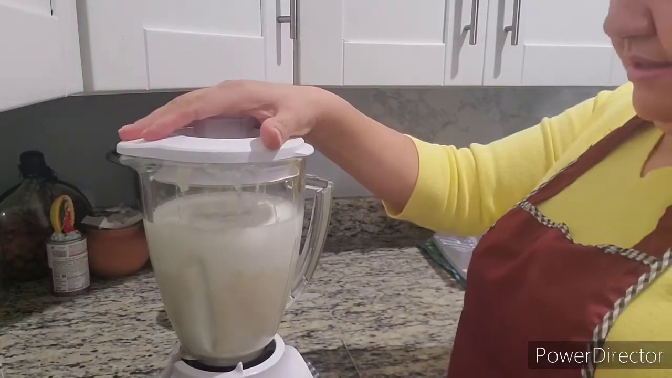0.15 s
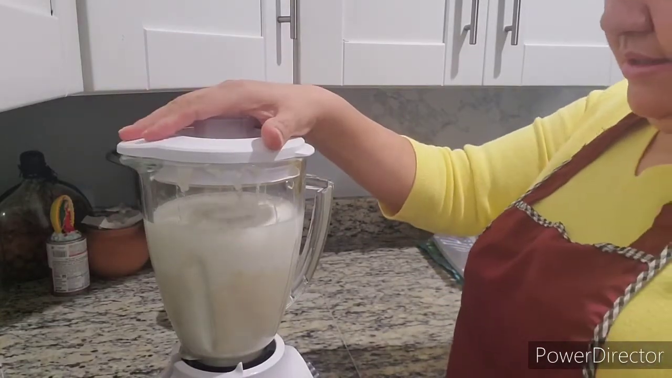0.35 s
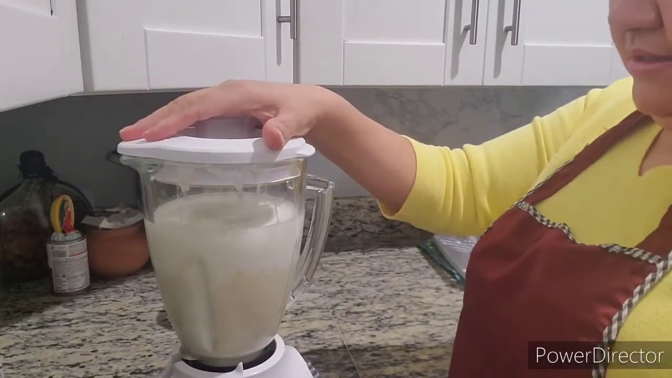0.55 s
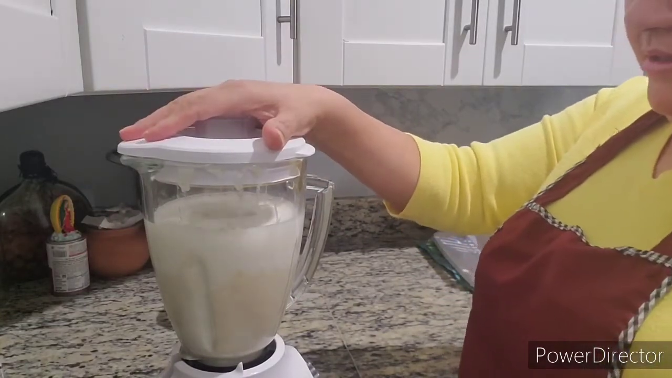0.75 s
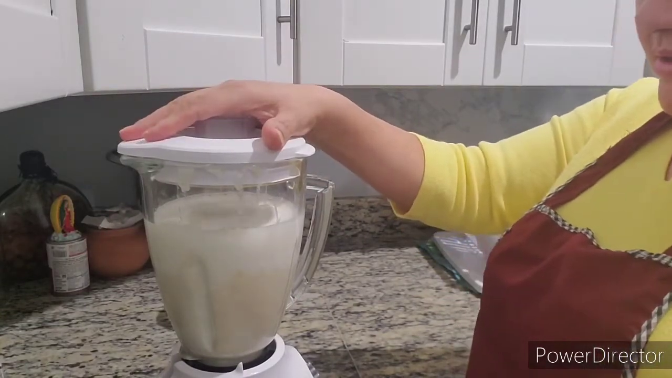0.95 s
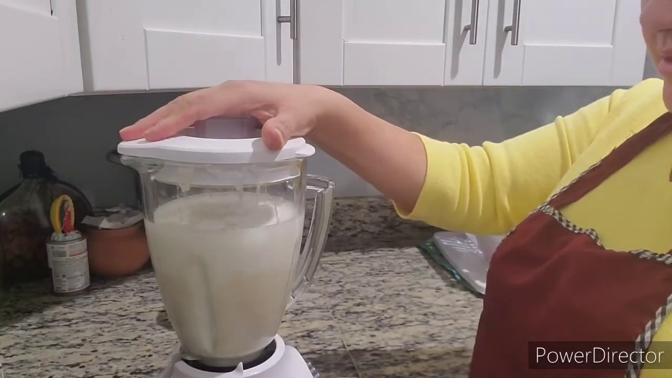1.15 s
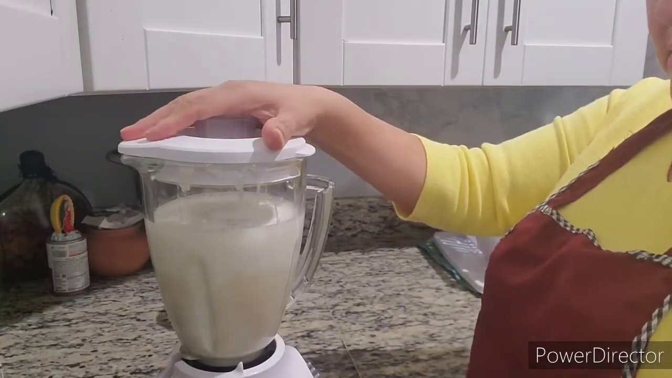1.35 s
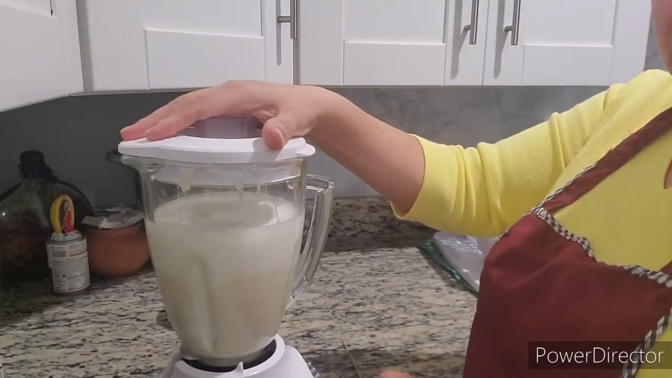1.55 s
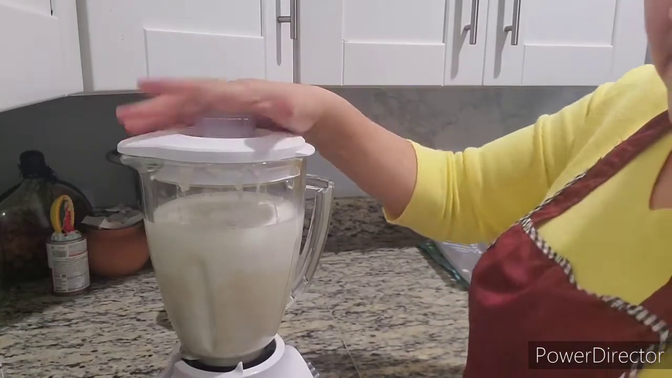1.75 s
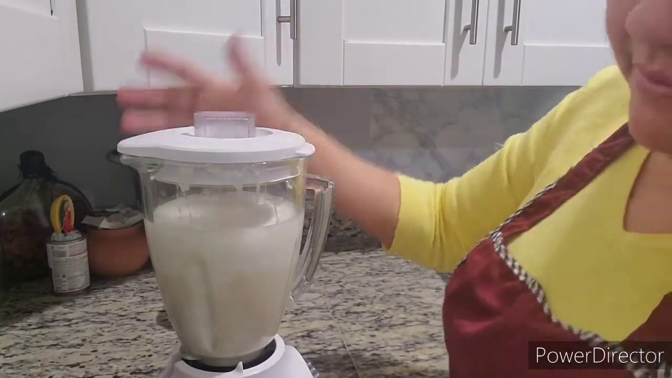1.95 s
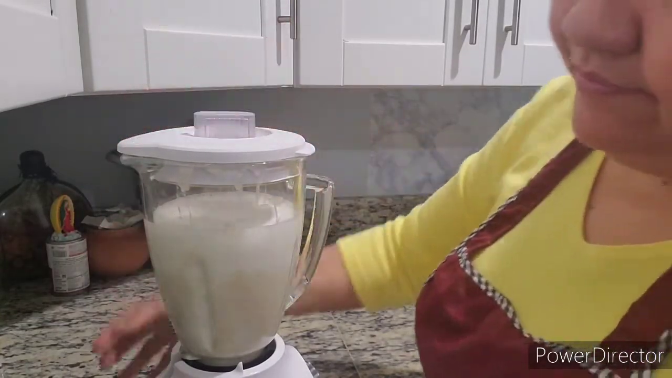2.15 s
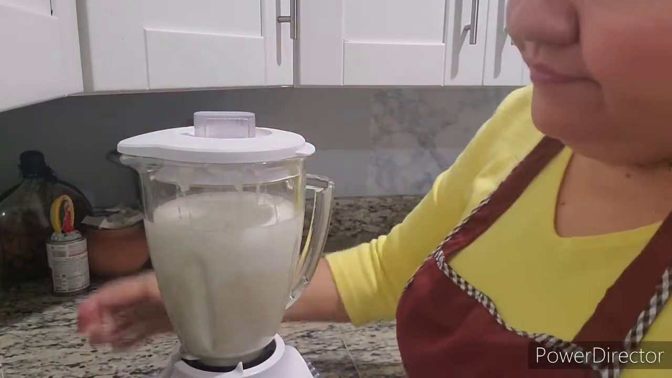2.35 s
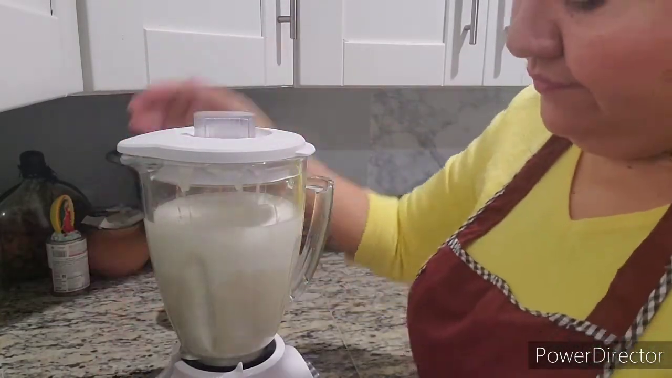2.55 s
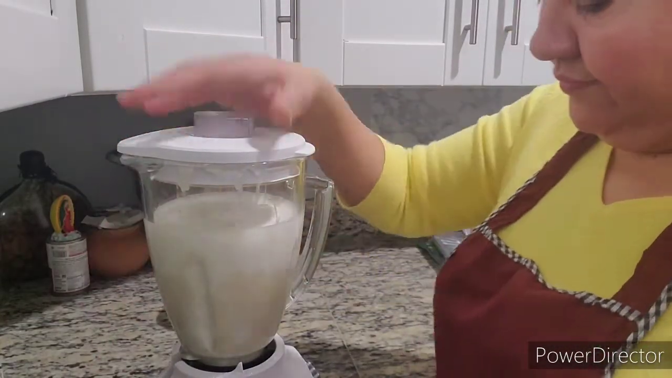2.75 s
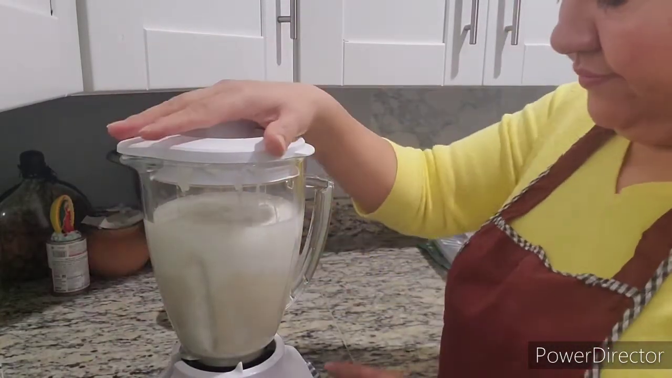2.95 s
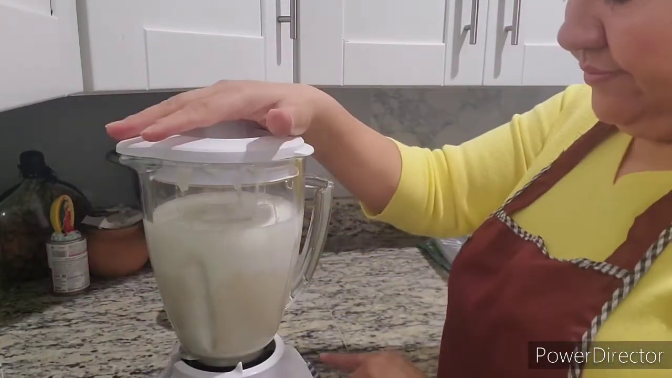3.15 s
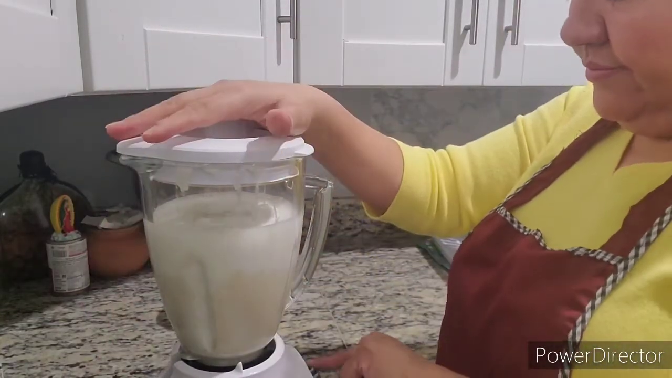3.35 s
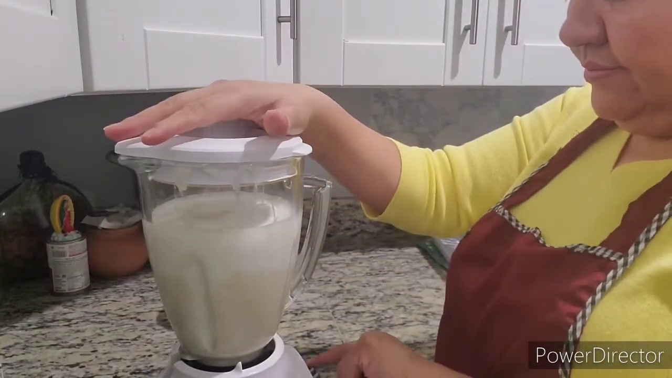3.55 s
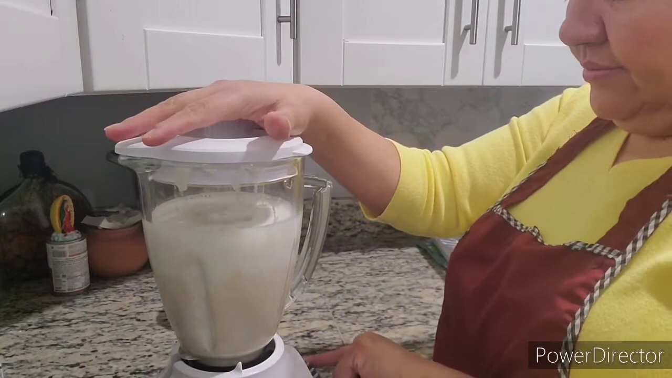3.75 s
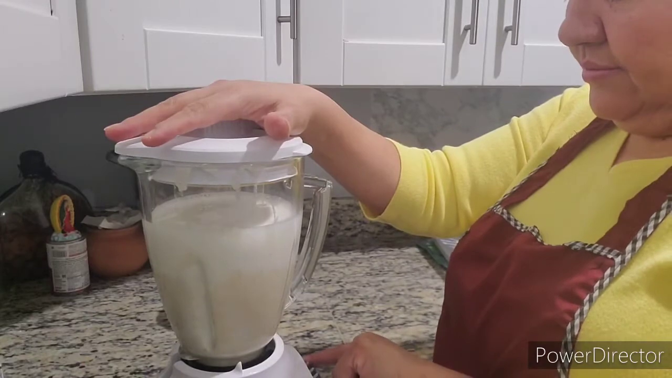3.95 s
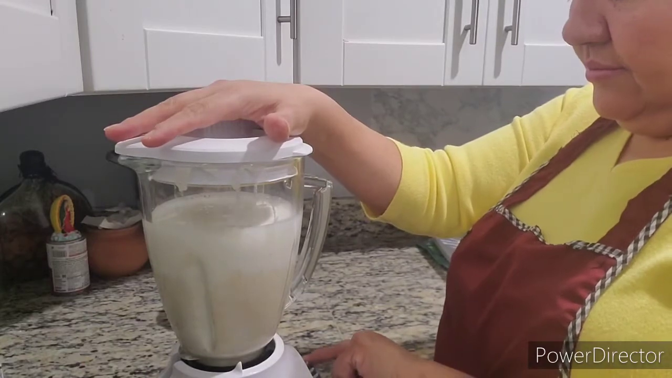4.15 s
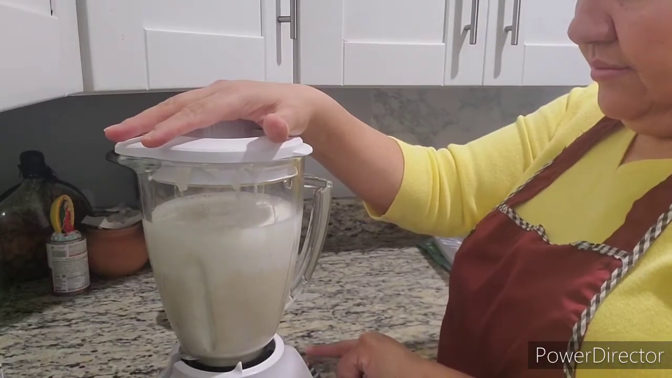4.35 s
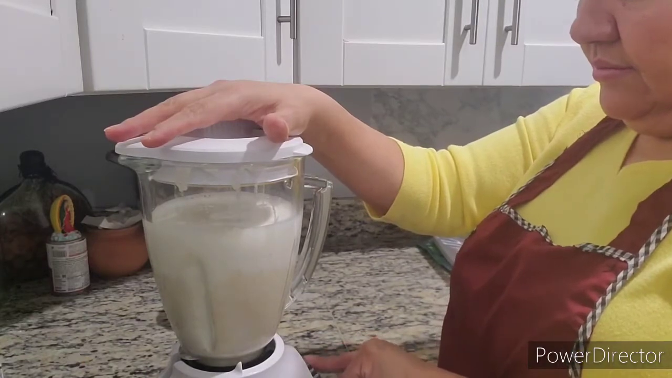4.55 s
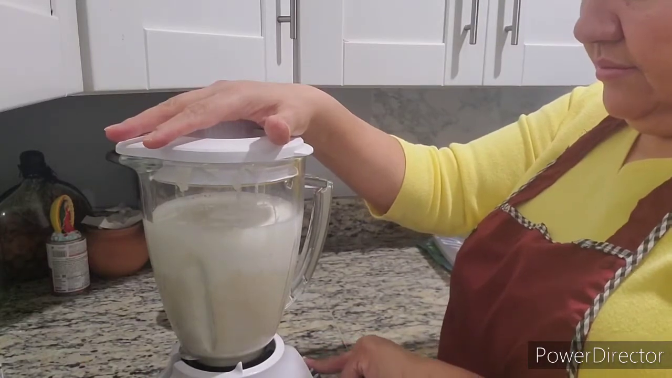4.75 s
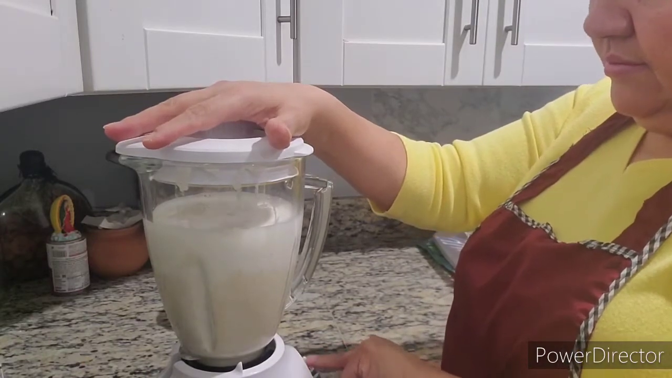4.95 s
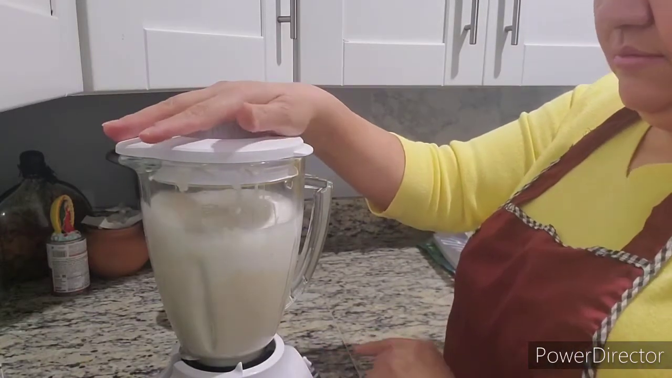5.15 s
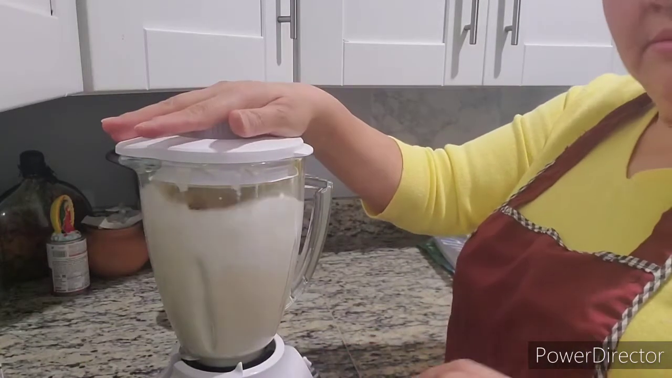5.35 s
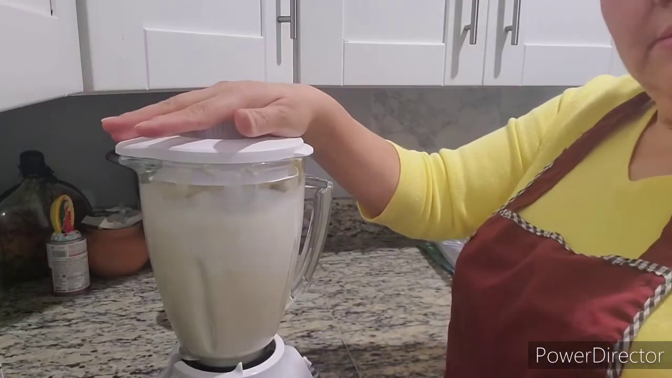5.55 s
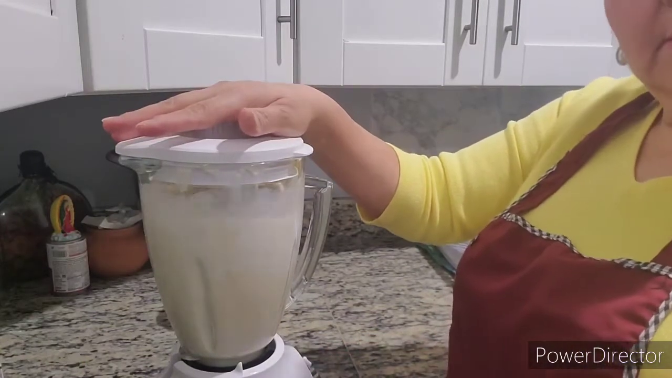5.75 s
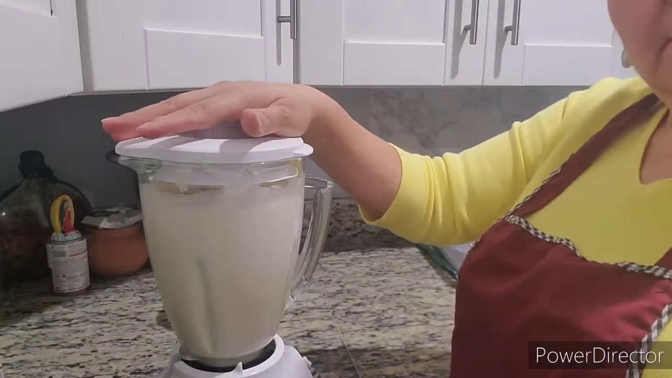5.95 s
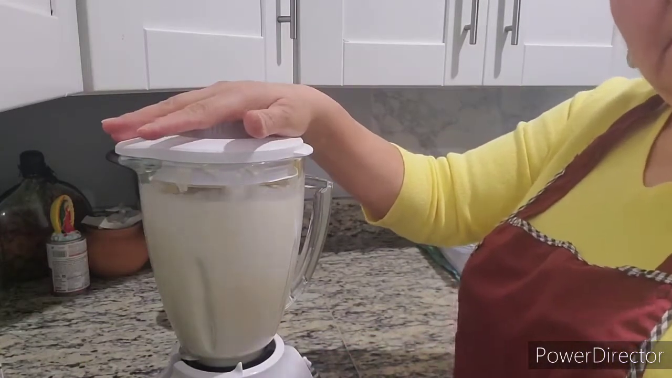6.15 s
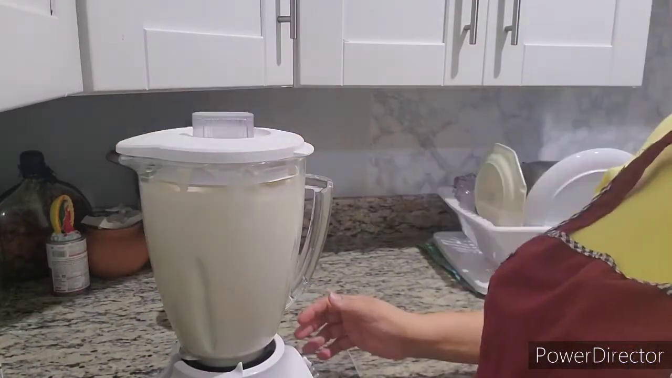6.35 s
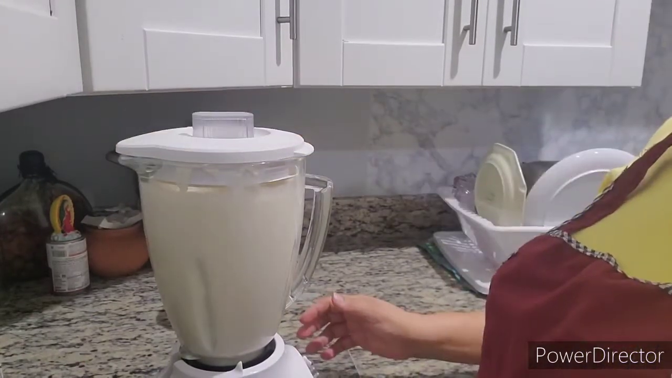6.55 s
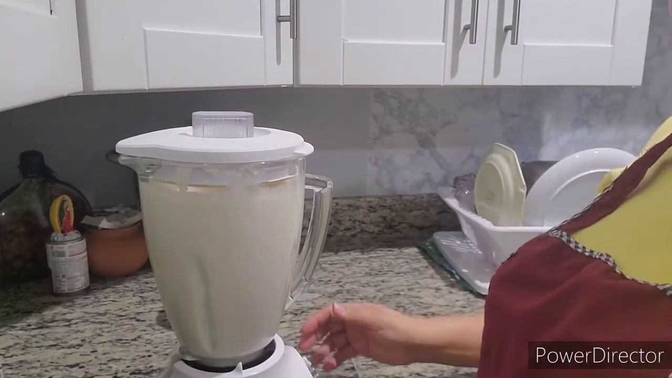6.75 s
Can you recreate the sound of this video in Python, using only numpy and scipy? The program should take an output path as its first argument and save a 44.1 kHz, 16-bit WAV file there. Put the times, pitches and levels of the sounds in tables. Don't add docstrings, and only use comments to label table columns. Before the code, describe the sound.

A quiet, close stereo kitchen with a low fridge hum. Light finger taps and dull knocks on a plastic blender lid and counter come irregularly, with faint rubs, creaks and a small squeak. Late on, a hard switch click starts the blender: a buzzing motor labours with gurgling liquid, then frees and climbs into a bright, hissing, rattling roar that runs to the end.

```python
import sys
import numpy as np
from scipy import signal
from scipy.fft import rfft, irfft, next_fast_len
from scipy.io import wavfile

SR = 44100
rng = np.random.default_rng(int(sys.argv[2]) if len(sys.argv) > 2 else 0)


def elevation(decibels):
    levels = np.asarray(decibels, float)
    return 10 ** (levels / 20)


def materialize(psi):
    bounded = np.clip(np.atleast_2d(psi).T, -1, 1)
    quanta = np.round(bounded * 32767).astype(np.int16)
    wavfile.write(sys.argv[1], SR, quanta)


N = 299553

# frequency [hz], likeness [0 to 1]
LIKENESS = [(60, 0.9), (150, 0.98), (250, 0.94), (500, 0.74), (1000, 0.42), (1500, 0.18), (2300, 0.65),
            (4000, 0.13), (12000, 0.067)]
# frequency [hz], left_minus_right [db]
BALANCE = [(60, 0.5), (500, 2), (2300, 2.5), (5000, 2.5), (12000, 3)]
PORT_LAG = 4

# frequency [hz], density [db per hz]
ROOM_TONE = [(12, -41), (20, -11), (49, -3.5), (113, -2.5), (222, -8), (293, -16), (367, -12.5),
             (472, -20.5), (624, -28), (873, -32.5), (1220, -35), (1330, -38), (2600, -48.5), (5600, -47.5),
             (6700, -44), (8000, -54.5), (16000, -49)]
ROOM_TONE_DB = -47
# pitch [hz], rms_level [db]
FRIDGE = [(59.2, -63), (118.4, -60.5), (215.3, -59.5), (236.9, -62.5), (360.7, -69), (473.7, -73),
          (947.5, -83)]
WHINE_HZ, WHINE_DB = 1195, -73.5
# start [s], end [s], loss [db]
WHINE_HIDDEN = [
    (2.08, 2.82, 20),
]
# start [s], end [s], level_over_stillness [db]
ARM_MOVES = [
    (.4, 1.85, 13),
    (1.9, 2.3, 15.3),
    (2.5, 3.58, 18.4),
    (3.85, 4.55, 8.7),
]
STILL_DB = -87.5

# start [s], end [s], level [db], centre [hz],
# width [hz]
RUBS = [(.72, .98, -73, 4460, 900), (1.29, 1.42, -69, 3500, 1600), (1.51, 1.57, -72, 3300, 2200),
        (1.82, 2.02, -71, 1800, 900), (2.02, 2.32, -73.5, 6500, 7000), (2.42, 2.5, -72, 4000, 2500),
        (2.505, 2.56, -65, 1870, 600), (2.52, 2.75, -74, 2300, 1500), (2.74, 2.89, -58.5, 3000, 4200),
        (2.74, 2.89, -66, 800, 500), (2.908, 2.925, -38, 1110, 950), (3.114, 3.124, -45, 5660, 1500),
        (3.588, 3.612, -44.5, 373, 160), (3.588, 3.612, -46.5, 704, 400), (3.588, 3.605, -54, 1680, 900),
        (3.83, 3.87, -74, 4300, 1600), (4.522, 4.54, -69.5, 4100, 1300), (4.661, 4.74, -63, 1320, 590),
        (4.661, 4.74, -66.5, 3300, 1200)]
# start [s], end [s], level [db], centre [hz], width [hz]
CREAKS = [(.83, .87, -76, 2850, 200), (.92, .94, -74, 2850, 200), (.965, .98, -75, 2850, 200),
          (1.87, 2.02, -69, 1560, 130), (2.503, 2.525, -55, 3380, 520), (2.52, 2.72, -72, 3480, 200),
          (2.64, 2.74, -78, 2280, 120), (2.74, 2.89, -67, 2180, 250), (2.76, 2.89, -62, 2830, 120),
          (2.74, 2.89, -65, 3980, 110), (2.74, 2.89, -70, 5250, 120), (3.19, 3.4, -78, 7400, 250),
          (4.135, 4.16, -74, 2850, 250)]
# start [s], end [s], level [db], first_pitch [hz], last_pitch [hz]
SQUEAKS = [
    (3.03, 3.19, -74, 2200, 2150),
    (3.19, 3.42, -66.5, 2120, 2210),
]
# start [s], peak_level [db], pitch [hz]
KNOCKS = [
    (0.378, -31, 245),
    (2.888, -29.5, 218),
    (2.909, -31.5, 56),
    (3.124, -37, 55),
    (3.39, -43, 69.6),
    (3.572, -32, 80.4),
    (3.599, -33.5, 151),
    (3.634, -35.5, 60.4),
]
# start [s], body [db], click [db re body], tick [db re body], click_pitch [hz]
TAPS = [(0.198, -52, -13, -17, 2350), (0.375, -19.5, -12.5, -9, 3580), (0.556, -32.5, -16.5, -21, 2940),
        (0.584, -48.5, -3, -6, 2930), (1.048, -33.5, -4.5, -7, 3540), (1.154, -58.5, -20, 5, 7210),
        (1.325, -45, -14, -17, 2820), (1.517, -47.5, -11, -26, 2700), (1.701, -52, -4.5, 1, 3550),
        (2.505, -61, 7, -6, 3350), (2.889, -34, 0.5, -5, 2030), (2.912, -36.5, -2, -8, 2920),
        (3.116, -35.5, -1.5, -6.5, 4240), (3.384, -31.5, -5.5, -9, 2170), (3.446, -44, -7, -23, 2220),
        (3.591, -31.5, -30, -42, 2000), (3.619, -43.5, 4, -14, 3930), (3.702, -47.5, -6, -25, 3910),
        (3.816, -50.5, -6, -19, 4300), (3.992, -50, -31, -25, 2070), (4.185, -47, -1.5, 5, 2860),
        (4.425, -44, -1.5, -14, 3140), (4.681, -42, -41, -33, 3080), (4.73, -32, -3, -10, 3190),
        (4.7344, -15, -3.5, -4, 2280), (4.737, -20, 5, 5.5, 4500), (4.744, -27, -3, -6, 3000)]
# pitch [hz], level [db], t60 [s]
LID = [(520, 7.5, 0.058), (616, 0.5, 0.046), (707, -0.5, 0.073), (840, 2.5, 0.023), (1016, -8, 0.035),
       (1162, 3.5, 0.034), (1303, 2, .04), (400, -6, 0.044)]
ROOM_T60_S, WET_DB, TAP_PAN_DB = 0.28, -6.5, 0.5

START_S = 4.734
BUZZ_HZ = 119.5
# time [s], speed [turns per s]
SPEED = [(4.734, 40), (4.86, 99), (4.958, 120.3), (5.01, 126.8), (5.09, 134.8), (5.17, 138.7), (5.28, 141),
         (5.355, 142.4), (5.405, 167), (5.5, 186), (5.57, 191.5), (5.7, 201), (5.95, 210.5), (6.24, 217.6),
         (6.605, 221.5), (6.635, 224.3), (6.8, 224.9)]
# time [s], level [db]
LOAD = [(4.76, -27), (4.8, -36), (4.84, -28), (4.89, -24), (4.97, -23), (5.15, -22), (5.29, -18),
        (5.39, -23), (5.9, -23.5), (6.26, -26.5), (6.79, -27.5)]
FREE_LOAD_DB = -25
ORDER_MULTIPLES = [1, 2, 4, 12]
ORDER_FORCE = [-44.5, -50.5, -50.5, -48.5]
ORDER_FOLLOWS_LOAD = [0.63, 0.33, 0.95, .05]
# centre [hz], width [hz], level [db]
FRAME = [(112, 37, 17), (139, 20, 11), (170, 14, 17), (214.6, 33, 10.5), (355.4, 40, 20.5), (460, 12, 1),
         (520, 104, 16.5), (563.2, 12.5, 26.5), (1434, 120, 20), (2205, 240, 31), (2540, 190, 22.5),
         (2680, 96, 31.5)]
BUZZ_DB, BUZZ_FALL = -18.5, 0.13

# frequency [hz], density [db per hz]
SLOSH = [(25, -39), (45, 4), (70, 16), (110, -5), (200, -16)]
# time [s], peak_level [db]
SLOSHES = [
    (4.87, -36),
    (5.05, -35),
    (5.34, -31),
    (5.48, -26),
    (5.81, -33),
    (5.96, -44),
    (6.12, -42),
    (6.44, -37),
]
SLOSH_REST_DB, SLOSH_RISE, SLOSH_FALL = -69, 240, 140
# start [s], end [s], level [db], centre [hz], width [hz]
GULPS = [
    (5.08, 5.2, -37, 159, 14),
    (5.26, 5.33, -28, 152, 18),
    (5.25, 5.33, -34, 340, 29),
    (5.25, 5.33, -26, 435, 80),
    (5.25, 5.33, -30.5, 610, 150),
    (5.2, 5.33, -26, 1350, 87),
    (4.85, 5.0, -32, 1020, 82),
    (5.25, 5.33, -32, 750, 200),
    (6.65, 6.8, -33, 437, 60),
]
# frequency [hz], density [db per hz]
CHURN = [(53, -52), (90, -10), (173, -9.5), (209, -8.5), (280, -11), (362, -6.5), (610, -5.5), (1020, -6),
         (1590, -11.5), (1900, -9.5), (2470, -66), (4180, -120)]
# centre [hz], width [hz], level [db]
CHURN_PEAKS = [(368.4, 17, -6), (838, 32, -3), (1038, 76, -2.5), (1357.6, 79, -2), (1440, 390, -5)]
# start [s], end [s], level [db], centre [hz], width [hz]
BRUSHES = [(4.74, 4.9, -33.5, 5600, 6300), (4.84, 4.98, -35, 8100, 270), (4.84, 4.98, -36, 6250, 344),
           (4.9, 5.8, -31, 3700, 430), (5.14, 5.23, -37, 7400, 350), (5.45, 6.05, -32.5, 7100, 6400),
           (5.42, 6.3, -40.5, 7050, 200), (5, 6.45, -46, 6430, 200), (4.9, 5.35, -34, 2920, 200),
           (4.87, 5.23, -36, 2230, 170), (6.05, 6.42, -35, 4060, 90), (6.05, 6.3, -31.5, 3520, 70)]

# centre [hz], width [hz], level [db]
HOUSING = [(2137, 70, -5), (2200, 70, -5), (2293, 92, -3.5), (2466, 220, -14.5)]
# centre [hz], width [hz], level [db]
COWL = [(2600, 200, -0.5), (2690, 85, 3.5), (2843, 144, 3), (2991, 52, 7.5), (3120, 97, 2.5),
        (5250, 170, -7)]
COWL_RISE = 0.55
# speed [turns per s], level [db]
SHAKE = [(75, -53), (97, -27.5), (122, -24), (143, -23), (188, -18), (200, -14.5), (221, -15.5), (225, -19)]
# time [s], peak_level [db]
STRIKES = [(5.5056, -8), (5.5553, -4), (5.6027, -7), (5.662, -13), (5.6989, -4), (5.7922, -13),
           (5.9374, -6), (6.0674, -6), (6.0884, -6), (6.122, -6), (6.2298, 2), (6.2786, -5), (6.341, -1),
           (6.4462, -11), (6.4994, -11), (6.5296, -2)]
STRIKE_OVER_DB, STRIKE_FADE_S = 5.5, 0.0038
WANDER_DB, WANDER_PER_S = 1.2, 7
# time [s], left_minus_right [db]
SHADING = [
    (4.76, -1.5),
    (5.4, 1.5),
    (5.78, 0.5),
    (5.95, -5),
    (6.38, -7.5),
    (6.7, -2),
    (6.79, -1),
]
HISS_SHADED, SHADE_TOP_HZ = 0.94, 6000
# frequency [hz], density [db per hz]
HISS = [(1000, -62), (1700, -12.5), (1990, -8), (2220, -19), (2460, -11.5), (3040, -6.5), (3500, -9.5),
        (7060, -19), (9320, -23), (13200, -24), (15500, -23)]
AIR_DB, AIR_FULL_SPEED, AIR_RISE = -25, 136.3, 0.2


def rms_one(x):
    return x / np.sqrt(np.mean(x ** 2) + 1e-20)


def pan(left_minus_right_db):
    return elevation(np.array([[0.5], [-0.5]]) * left_minus_right_db)


def in_time(rows, start):
    time_s, value = np.transpose(rows)
    return np.interp(np.arange(start, N) / SR, time_s, value)


def at_hz(points, hz):
    table_hz, value = np.transpose(points)
    return np.interp(np.log(np.maximum(hz, 1)), np.log(table_hz), value)


def drift(rate, count):
    pole = np.exp(-80 * np.pi * rate / SR)
    noise = rng.standard_normal(count // 40 + 2002)
    slow = signal.lfilter([1], [1, -2 * pole, pole * pole], noise)[2000:]
    return np.interp(np.arange(count) / 40, np.arange(len(slow)), rms_one(slow))


def spans(rows, ease_s):
    t = np.arange(N) / SR
    return sum(db * np.clip(np.minimum(t - start, end - t) / ease_s + 0.5, 0, 1) for start, end, db in rows)


def peaks_gain(peaks, hz):
    power = 0
    for centre, width, db in peaks:
        detuning = (hz - centre) / width * 2
        power = power + elevation(db) ** 2 / (1 + detuning ** 2) ** 2
    return np.sqrt(power)


def ripple(depth_db, spacing_hz):
    hills = elevation(depth_db * rng.standard_normal(400))
    return lambda hz: np.interp(hz / spacing_hz, np.arange(len(hills)), hills)


def stereo_noise(gain_at, count, gate=1):
    size = next_fast_len(count)
    hz = np.arange(size // 2 + 1) * SR / size
    mid, side = rfft(rng.standard_normal((2, count)) * gate, size) * gain_at(hz)
    alike = np.clip(at_hz(LIKENESS, hz), 0, 1)
    pair = np.sqrt(1 + alike) * mid + np.sqrt(1 - alike) * side * [[1], [-1]]
    return rms_one(irfft(pair * pan(at_hz(BALANCE, hz)), size)[:, :count])


def swells(rows, grain_db, sag_db):
    out = np.zeros((2, N))
    for start, end, db, centre, width in rows:
        at, count = round(start * SR), round((end - start + 0.08) * SR)
        t = np.arange(count) / SR
        fade_db = -sag_db * t / (end - start + 0.027) - 260 * np.maximum(t - end + start, 0)
        rise = np.clip(t / (0.11 * (end - start)), 0, 1)
        shape = rise * elevation(fade_db + grain_db * drift(21, count))
        noise = stereo_noise(lambda hz: peaks_gain([(centre, width, 0)], hz), count)
        out[:, at:at + count] += (elevation(db) * shape * noise)[:, :N - at]
    return out


def kitchen():
    t = np.arange(N) / SR
    hum = 0
    for hz, db in FRIDGE:
        hum = hum + np.sqrt(2) * elevation(db + 3.7 * drift(1.4, N)) * np.sin(2 * np.pi * hz * t)
    whine_db = WHINE_DB - spans(WHINE_HIDDEN, ease_s=0.15) + 1.3 * drift(5, N)
    hum = hum + np.sqrt(2) * elevation(whine_db) * np.sin(2 * np.pi * WHINE_HZ * t)
    air = stereo_noise(lambda hz: elevation(at_hz(ROOM_TONE, hz)), N, elevation(0.24 * drift(0.52, N)))
    cloth_peaks = [(3520, 8300, 6.5), (6570, 700, 6)]   # Hz, width Hz, dB
    cloth = stereo_noise(lambda hz: peaks_gain(cloth_peaks, hz), N, elevation(2.2 * drift(8, N)))
    cloth_db = STILL_DB + spans(ARM_MOVES, ease_s=0.15)
    return elevation(cloth_db) * cloth + elevation(ROOM_TONE_DB - 2.0) * air + hum * pan(1.4)


def squeaks():
    out = np.zeros(N)
    for start, end, db, first_hz, last_hz in SQUEAKS:
        at, count = round(start * SR), round((end - start) * SR)
        part = np.arange(count) / count
        hz = first_hz + (last_hz - first_hz) * part + 45 * drift(70, count)
        swell = np.sin(np.pi * part ** 1.4) ** 0.6 * elevation(db + 4.0 * drift(45, count))
        out[at:at + count] += np.sqrt(2) * swell * np.sin(2 * np.pi * np.cumsum(hz) / SR)
    return out


def rubs():
    return swells(RUBS, grain_db=2.5, sag_db=3.0) + swells(CREAKS, grain_db=0.0, sag_db=1.0) + squeaks()


def knocks():
    out = np.zeros(N)
    t = np.arange(round(0.15 * SR)) / SR
    for s, db, hz in KNOCKS:
        at = round(s * SR)
        t60 = 0.052 + 8.3 / hz
        out[at:at + len(t)] += elevation(db - 60 * t / t60) * np.sin(2 * np.pi * hz * t)
    return out * pan(1.6)


def ring(clicks, hz, t60):
    r, w = elevation(-60 / (t60 * SR)), 2 * np.pi * hz / SR
    return signal.lfilter([0, np.sin(w)], [1, -2 * r * np.cos(w), r * r], clicks + 1e-18)


def taps():
    out, count = np.zeros((2, N)), round(0.32 * SR)
    t, strike = np.arange(count) / SR, np.arange(count) == 0
    room = elevation(-60 * t / ROOM_T60_S)
    tail = elevation(WET_DB) * np.clip(t / 0.0071, 0, 1)
    shares_db = rng.normal(0, 1.5, (len(TAPS), len(LID)))
    for (s, body_db, click_db, tick_db, click_hz), share_db in zip(TAPS, shares_db):
        rise = np.clip(t / (0.00064 * elevation(-0.6 * (body_db + 29.0))), 0, 1)
        dull_db = 0.22 * min(click_db + 30, 0)
        body = 0
        for (hz, db, t60), share in zip(LID, share_db):
            mode_db = db + share - 9.5 + dull_db * np.log2(hz / 500)
            body = body + elevation(mode_db) * ring(strike, hz, t60)
        boom_peaks = [(f, 130, db + dull_db * np.log2(f / 500)) for f, db, t60 in LID] + [(284, 200, -0.79)]
        click_peaks = [(3000, 3500, -5), (click_hz, 1100, -2)]
        tick_peaks = [(6500, 3100, -4.5), (12000, 23000, -6.5)]
        boom = stereo_noise(lambda hz: peaks_gain(boom_peaks, hz), count)
        click = stereo_noise(lambda hz: peaks_gain(click_peaks, hz) * hz / (hz + 900), count)
        tick = stereo_noise(lambda hz: peaks_gain(tick_peaks, hz), count)
        sound = body * np.clip(t / 0.0025, 0, 1) + elevation(-9) * boom * tail * room
        sound += elevation(click_db - 3.0) * click * (elevation(-60 * t / 0.035) + tail * room)
        sound += elevation(tick_db - 1.0) * tick * (elevation(-60 * t / 0.013) + tail * elevation(-100 * t / ROOM_T60_S))
        at = round(s * SR)
        out[:, at:at + count] += sound * rise * elevation(body_db) * pan(TAP_PAN_DB)
    return out


def slosh_level(t):
    levels = [SLOSH_REST_DB + 0 * t]
    for s, db in SLOSHES:
        levels.append(db - np.where(t < s, SLOSH_RISE * (s - t), SLOSH_FALL * (t - s)))
    return np.max(levels, axis=0)


def liquid(start, churn_db, surge):
    count = N - start
    slosh_gate = elevation(2.0 * drift(24, count))
    slosh = stereo_noise(lambda hz: elevation(at_hz(SLOSH, hz)), count, slosh_gate)
    churn = stereo_noise(lambda hz: elevation(at_hz(CHURN, hz)) * (0.41 + peaks_gain(CHURN_PEAKS, hz)),
                         count, elevation(0.85 * surge))
    return elevation(slosh_level(np.arange(start, N) / SR)) * slosh + elevation(churn_db) * churn


def air_hiss(speed, chop, surge, shade_db):
    shell = ripple(depth_db=1.8, spacing_hz=60)

    def colour(hz):
        return shell(hz) * elevation(at_hz(HISS, hz) - 1.2 * np.exp(-((hz - 2600) / 600) ** 2))

    hiss = stereo_noise(colour, len(speed), chop * elevation(0.091 * surge))
    lower = signal.sosfilt(signal.butter(2, SHADE_TOP_HZ, fs=SR, output="sos"), hiss)
    hiss = hiss + (pan(HISS_SHADED * shade_db) - 1) * lower
    hiss_db = AIR_DB + AIR_RISE * np.minimum(speed - AIR_FULL_SPEED, 0)
    return elevation(hiss_db + 5.0) * hiss


def strikes(start):
    t = np.arange(start, N) / SR
    gain = 1
    for s, db in STRIKES:
        gain = gain + elevation(db + STRIKE_OVER_DB) * (t >= s) * np.exp(-np.maximum(t - s, 0) / STRIKE_FADE_S)
    return gain


def shell_ring(peaks, gate):
    out, count = 0, len(gate)
    for centre, width, db in peaks:
        wander = elevation(WANDER_DB * drift(WANDER_PER_S, count))
        mode = stereo_noise(lambda hz: peaks_gain([(centre, width, 0)], hz), count, gate * wander)
        out = out + elevation(db) * np.sqrt(width) * mode
    return rms_one(out)


def shells(speed, struck, surge, shade_db):
    count = len(speed)
    housing = shell_ring(HOUSING, struck * elevation(0.5 * drift(39, count) + 0.32 * surge))
    cowl = shell_ring(COWL, struck * elevation(0.41 * drift(43, count)))
    cowl_db = -1.5 + COWL_RISE * np.clip(speed - 212, -14, 0)
    ring_db = np.interp(speed, *np.transpose(SHAKE))
    return elevation(ring_db - 2) * (housing + elevation(cowl_db) * cowl) * pan(shade_db)


def tone_levels(speed, load_db):
    levels = []
    for multiple, force_db, follows in zip(ORDER_MULTIPLES, ORDER_FORCE, ORDER_FOLLOWS_LOAD):
        frame_db = 10 * np.log10(1 + peaks_gain(FRAME, multiple * speed) ** 2)
        levels.append(force_db + follows * (load_db - FREE_LOAD_DB) + frame_db)
    return levels + [BUZZ_DB - BUZZ_FALL * speed]


def motor_tones(speed, levels_db):
    count = len(speed)
    turn = 2 * np.pi * np.cumsum(speed * (1 + 0.0007 * drift(25, count))) / SR
    mains = 2 * np.pi * BUZZ_HZ * np.arange(count) / SR
    third = 0.7 * np.clip((188 - speed) / 10, 0, 1)
    waves = [np.sin(turn),
             np.sin(2 * turn) + third * np.sin(3 * turn),
             np.sin(4 * turn),
             np.sin(12 * turn),
             np.sin(mains) + 0.19 * np.sin(2 * mains) + 0.43 * np.sin(3 * mains + 1)]
    out = 0
    for wave, db, flutter_db in zip(waves, levels_db, [1.0, 2.0, 1.3, 0.8, 0.8]):
        out = out + wave * np.sqrt(2) * elevation(db + flutter_db * drift(19.0, count))
    return out * pan(2.2), turn


def blender():
    start = round(START_S * SR)
    count = N - start
    speed, churn_db, shade_db = in_time(SPEED, start), in_time(LOAD, start), in_time(SHADING, start)
    tones, turn = motor_tones(speed, tone_levels(speed, churn_db))
    mains = 2 * np.pi * BUZZ_HZ * np.arange(count) / SR
    chop = 1 + 0.033 * np.sin(turn) + 0.096 * np.sin(mains)
    surge = drift(12.5, count)
    roar = liquid(start, churn_db, surge)
    roar = roar + shells(speed, chop * strikes(start), surge, shade_db)
    roar = roar + air_hiss(speed, chop, surge, shade_db)
    rise = np.minimum(np.arange(count) / (0.014 * SR), 1)
    return np.pad((tones + roar) * rise, ((0, 0), (start, 0)))


def scene():
    motor = blender() + swells(GULPS, grain_db=1.5, sag_db=0.0) + swells(BRUSHES, grain_db=1.0, sag_db=-1.5)
    left, right = kitchen() + rubs() + knocks() + taps() + motor
    return np.array([left, np.pad(right, (PORT_LAG, 0), "edge")[:N]])


def top_cut(x):
    return signal.sosfilt(signal.butter(12, 16290, fs=SR, output="sos"), x)


def record(dry):
    rounded = 1.3 * np.tanh(dry / 1.3)
    dulled = signal.sosfilt(signal.cheby2(8, 22, 15650, fs=SR, output="sos"), rounded)
    mix = signal.sosfilt(signal.cheby2(12, 60, 16300, fs=SR, output="sos"), dulled)
    return top_cut(mix)


dry = scene()
out = record(dry)
materialize(out)
```